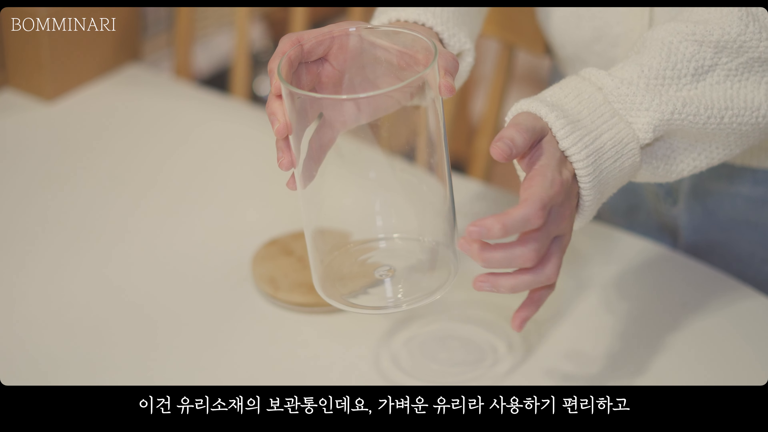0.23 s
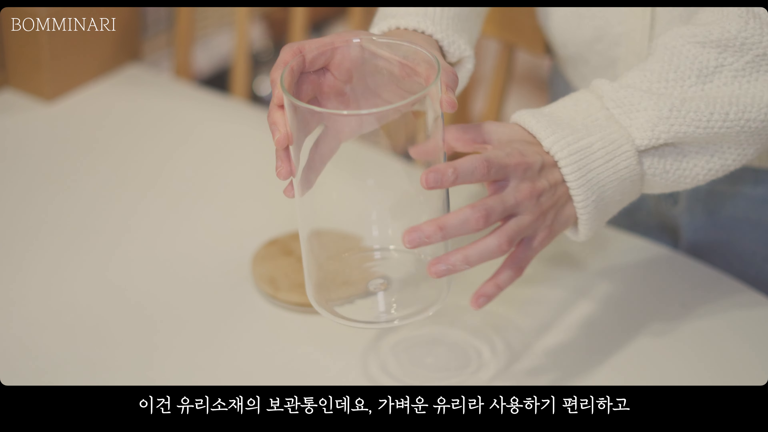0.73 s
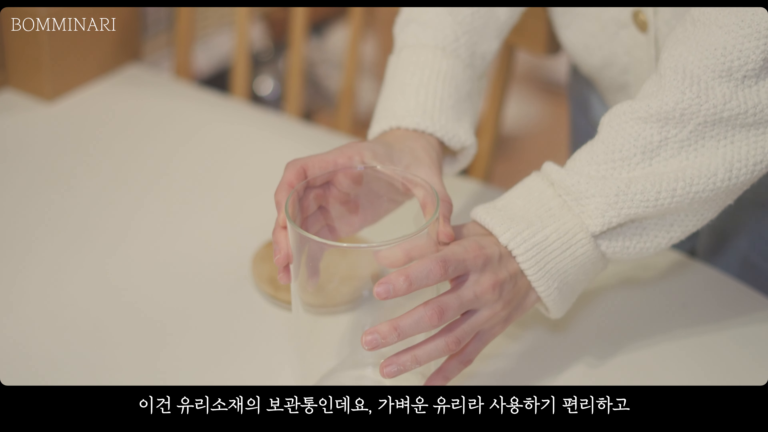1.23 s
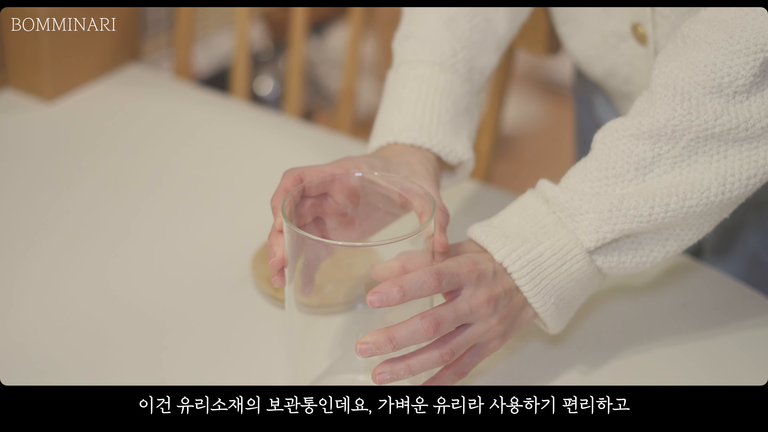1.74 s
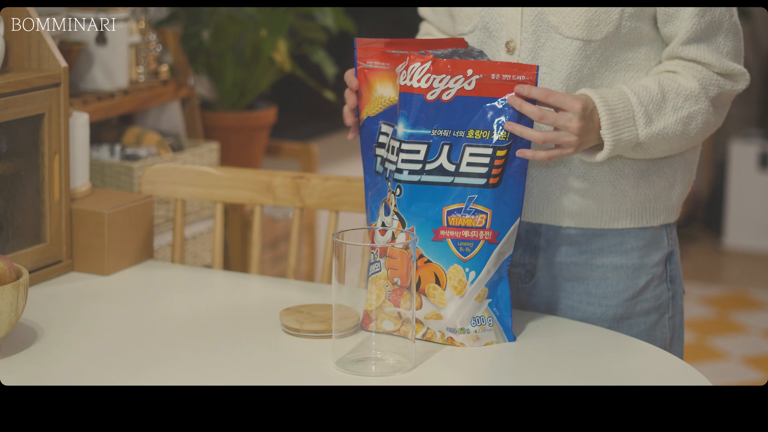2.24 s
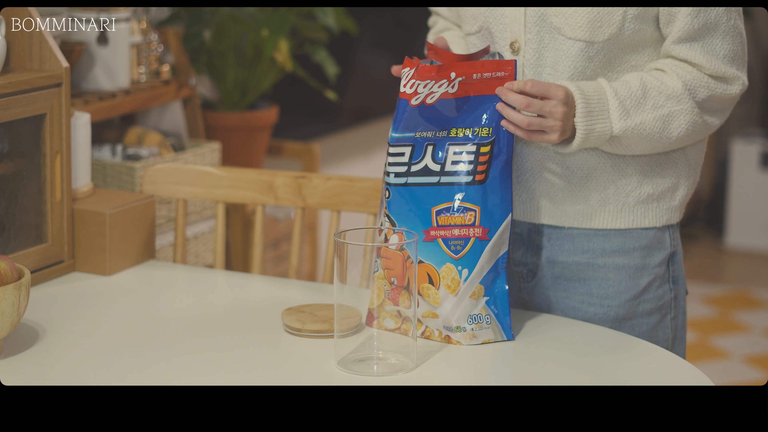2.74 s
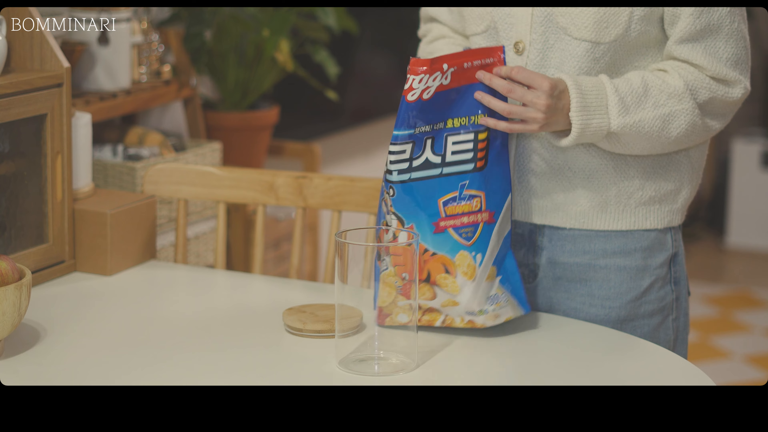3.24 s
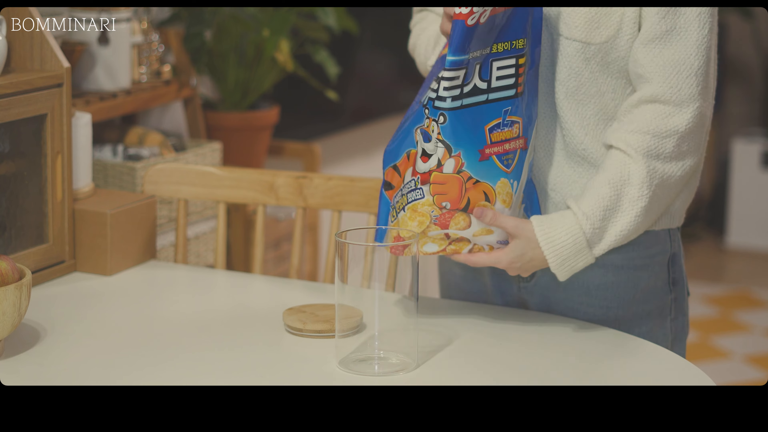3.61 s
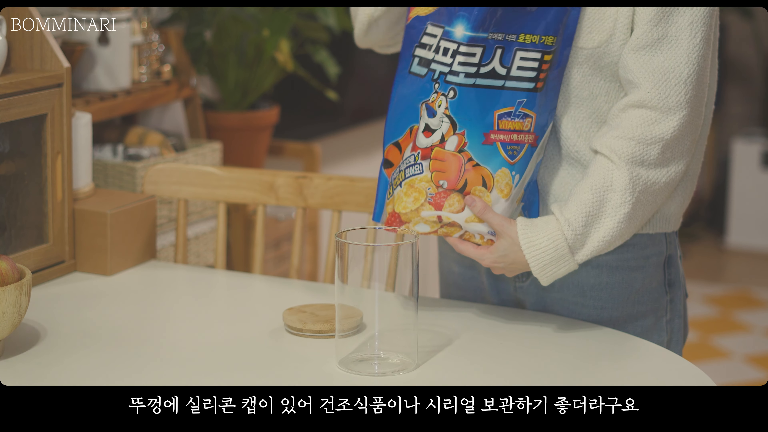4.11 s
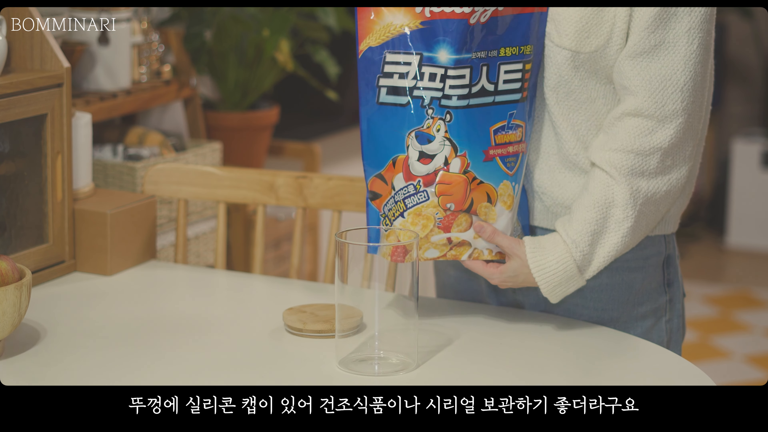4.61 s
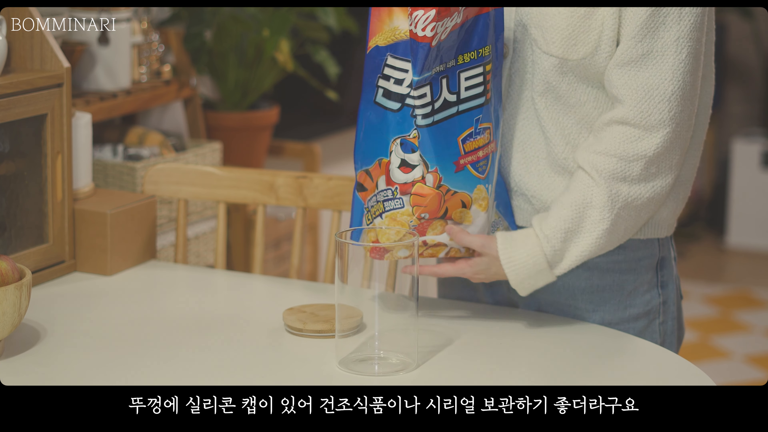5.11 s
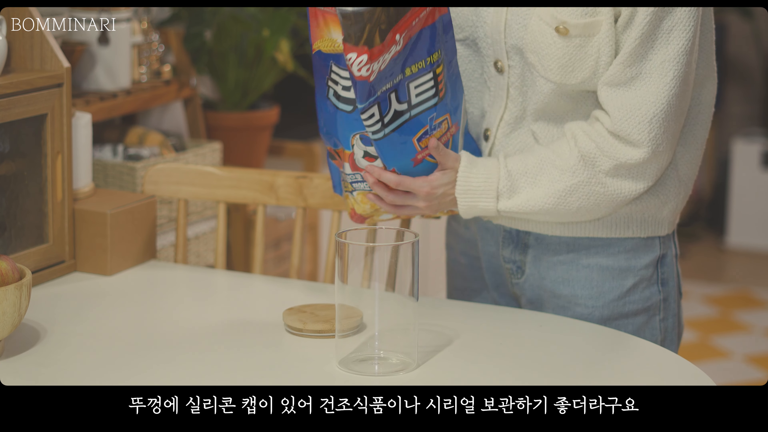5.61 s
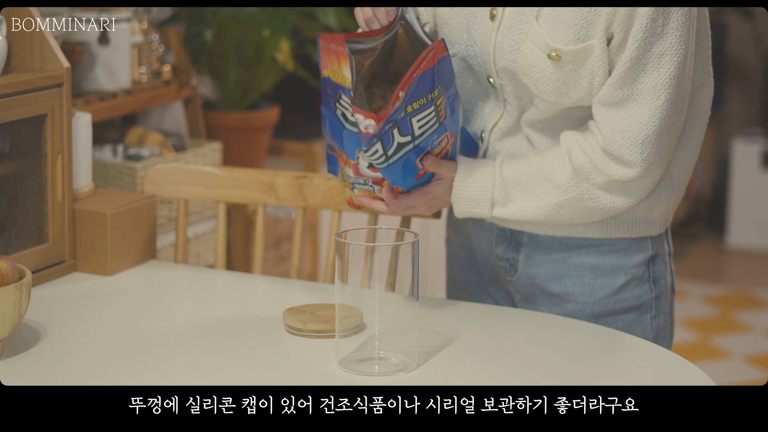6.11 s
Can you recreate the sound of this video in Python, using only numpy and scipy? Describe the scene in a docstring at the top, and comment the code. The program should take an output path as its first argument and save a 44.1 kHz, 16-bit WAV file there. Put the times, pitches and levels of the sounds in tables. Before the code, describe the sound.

Quiet indoor room tone with a barely audible appliance hum. A small piece of metal is tapped lightly four times, then a hollow object knocks twice on a wooden surface. A thick film bag of dry cereal then starts crinkling close by, with loud crisp pops, gritty rustle and brief lulls, getting busier near the end, with short table and wall reflections.

```python
"""In a small hard room, a stiff plastic bag of dry flakes is pulled open and tipped over a table.
Before it come a few light metal clinks and two knocks on wood, made of decaying tones.
The bag is made of short clicks filtered into bands: loud snaps and fine crackle, plus the hiss of sliding film.
The table and walls echo these sounds; a faint appliance hum and microphone hiss lie under them."""
import sys
import numpy as np
from scipy import signal
from scipy.fft import rfft, irfft
from scipy.io import wavfile
from scipy.ndimage import uniform_filter1d

SR = 44100
rng = np.random.default_rng(int(sys.argv[2]) if len(sys.argv) > 2 else 0)


def boost_factor(decibels):
    """Convert a level in decibels to a linear amplitude factor."""
    exponent = np.asarray(decibels, float) / 20
    return 10 ** exponent


def materialize(psi):
    """Save the field psi as 16-bit PCM at rate SR to the path in sys.argv[1].

    A 1-D psi becomes a single channel; in a 2-D psi each row is a channel.
    """
    bounded = np.clip(np.atleast_2d(psi).T, -1, 1)
    quanta = np.round(bounded * 32767).astype(np.int16)
    wavfile.write(sys.argv[1], SR, quanta)


N = 280476
T = np.arange(N) / SR  # seconds
BANDS_HZ = 180 * 2 ** np.arange(0, 6.6, .5)  # half-octave steps
OCTAVES = np.log2(BANDS_HZ / 2000)  # how far each band lies above 2 kHz
PLACES = 8  # places on the bag that make clicks

# Creases that snap. Each row: start in seconds, relative level in dB, favoured frequency in Hz,
# brightness in dB per octave.
SNAP_EVENTS = [(2.2143, -38, 5800, 5.5), (2.3002, -32, 1230, 7.5), (2.3464, -31, 1650, -5.5),
               (2.4214, -29, 1590, -8), (2.4412, -11.5, 1700, 6.5), (2.471, -28.5, 1450, -2),
               (2.539, -22, 1340, -4.5), (2.582, -9.5, 2080, 6), (2.622, -43, 1800, 7),
               (2.7229, -20.5, 1770, -3), (2.7436, -7, 1820, 9), (2.8048, -16, 2200, 1),
               (2.8222, -24, 2900, 1), (2.907, -10.5, 1900, 8.5), (2.927, -20, 1890, -3.5),
               (2.9865, -13.5, 1400, 1.5), (3.04, -20.5, 900, -7.5), (3.179, -26, 1900, 10),
               (3.1907, -13, 1920, 13), (3.2015, -8, 2300, 11), (3.2157, -16, 2600, -3),
               (3.279, -11, 2800, 15), (3.645, -29, 1240, 8), (3.684, -19.5, 1900, 10),
               (3.733, -27, 1320, 3), (3.7955, -21, 1260, 7), (3.8531, -13.5, 2750, 7),
               (3.8802, -20, 1700, 2.5), (4.012, -35, 5500, 14), (4.084, -28.5, 1580, 4.5),
               (4.123, -50, 7100, 21), (4.1794, -25.5, 1370, 10), (4.283, -26.5, 1160, -3),
               (4.299, -22, 1610, -3), (4.3255, -18, 2680, 16.5), (4.343, -10, 2340, 5.5),
               (4.352, -12.5, 2600, -2.5), (4.362, -25, 2900, -4), (4.4027, -15.5, 1890, -2),
               (4.475, -27, 1700, 5), (4.4967, -27.5, 1580, 3), (4.6205, -27, 816, 2),
               (4.907, -31.5, 3060, -3), (4.9403, -25, 1180, -1.5), (4.9701, -23, 1220, 1),
               (4.983, -16, 3420, 5.5), (4.9949, -17.5, 3000, 0), (5.0083, -17, 3640, 3.5),
               (5.086, -21.5, 1970, 4), (5.3014, -25.5, 947, -6), (5.3748, -26, 1280, 7),
               (5.405, -28.5, 1410, 0.2), (5.4899, -10.5, 5860, 10), (5.53, -15, 2200, 1.5),
               (5.6564, -16.5, 2080, -4.5), (5.7813, -19, 1420, 0), (5.8158, -12.5, 1170, 1.5),
               (5.831, -10.5, 2340, 0.5), (5.845, -14.5, 2900, 1), (5.863, -19.5, 2220, 1),
               (5.9995, -19, 2090, 4), (6.024, -16.5, 1300, 2), (6.0455, -15, 1060, -1.5),
               (6.0667, -20.5, 1280, 1), (6.101, -13.5, 5200, 18.5), (6.17, -20, 1690, 9.5),
               (6.2132, -15, 1490, 7.5), (6.275, -19.5, 1320, 8), (6.334, -25, 2200, 25)]


def bag():
    """Every place on the bag sends its own echoes; all have similar room tails, the crackle's slightly weaker."""
    snapping = sum(room(row, -23.0) for row in snaps())
    crackling = sum(room(row, -24.5) for row in crackle())
    rubbing = sum(room(row, -23.5) for row in sliding())
    balance_db = [[.15], [-.15]]  # very slightly to the left
    return (snapping + crackling + rubbing) * boost_factor(balance_db)


def snaps():
    """A big crease gives way in a quick run of cracks: the first is held back, then they fade."""
    cracks, run_ms = 4, 2.2
    first_db, fade_db = -4, -18
    start, level_db, hz, bright = np.transpose(SNAP_EVENTS)
    colour_db = favour(hz, 7.1, 0.32) + bright[:, None] * OCTAVES
    step = np.arange(cracks) / cracks
    chance = rng.random((len(start), 2, cracks))
    times = start[:, None] + run_ms / 1000 * step * (.5 + chance[:, 0])
    crack_db = fade_db * step + first_db * (step == 0)
    sign = np.sign(chance[:, 1] - .5)
    sizes = boost_factor(level_db[:, None] + 3.0 + crack_db) * sign
    # the crease runs along the film, so each crack in a run has its own place
    place = np.arange(times.size) % PLACES
    return clicks(times.ravel(), sizes.ravel(), np.repeat(colour_db, cracks, axis=0), place)


def crackle():
    """Countless small creases and flakes, few large and many small, come in flurries as the hands work."""
    count, first_s = 4000, 2.2
    calm_tilt, shower_tilt = -2.6, 0.11  # brightness in dB per octave
    flurry_samples, flurry_spread_db = 700, 0.5
    steady, shower = working()
    chance = rng.random((count, 4))
    times = first_s + (T[-1] - first_s) * chance[:, 0]
    at = (times * SR).astype(int)
    gain = np.hypot(steady, shower)[at]
    shower_share = (shower[at] / gain) ** 2
    tilt = calm_tilt + (shower_tilt - calm_tilt) * shower_share
    flurry_db = flurry_spread_db * rng.standard_normal(N // flurry_samples + 1)[at // flurry_samples]
    size_db = np.minimum(-5.0 * np.log(1 - chance[:, 1]), 21) + 1.18 + flurry_db
    sizes = gain * boost_factor(size_db) * np.sign(chance[:, 2] - .5)
    own_hz = 650 * 2 ** (4.1 * chance[:, 3])
    colour_db = favour(own_hz, 20, .5) + tilt[:, None] * OCTAVES
    return clicks(times, sizes, colour_db, np.arange(count) % PLACES)


def sliding():
    """Film sliding under the fingers: a fine grainy hiss at the very top, from several places on the bag."""
    # Each row: time in seconds, hiss level in dB relative to the handling strength.
    share = [(2.25, -4), (2.38, -16), (2.55, -22), (3.0, -15), (3.8, -12.5), (4.7, -11), (5.3, -13.5),
             (5.8, -1), (6.1, -6), (6.36, -7)]
    fingers, grain_samples, grain_spread_db = 4, 64, 7.0
    steady, shower = working()
    noise = rng.standard_normal((fingers, N))
    grain_db = grain_spread_db * rng.standard_normal((fingers, N // grain_samples + 1))
    grains = noise * boost_factor(grain_db).repeat(grain_samples, axis=1)[:, :N]
    hiss = band(grains, 14000.)
    hiss = hiss / hiss.sum(axis=0).std()
    strength = np.hypot(steady, boost_factor(-2.5) * shower)
    return hiss * strength * boost_factor(np.interp(T, *np.transpose(share)))


def working():
    """Gain of the steady handling, and of the showers of small creases that each snap shakes loose."""
    # How hard the hands work the bag. Each row: time in seconds, relative crackle level in dB.
    handling = [(2.25, -84), (2.38, -45), (2.7, -51), (3.059, -49.5), (3.16, -57.5), (3.34, -52),
                (3.61, -57.5), (3.73, -44.5), (4.01, -51.5), (4.15, -51), (4.4, -47.5), (4.68, -51),
                (4.746, -50.5), (4.868, -63), (5.0, -49), (5.2, -40.5), (5.33, -52), (5.45, -44),
                (5.62, -46.5), (5.85, -39.5), (5.95, -46.5), (6.1, -44.5), (6.36, -44.5)]
    shower_db, shower_t60 = -23, 0.15  # level against the snap; seconds to fade by 60 dB
    hold = 64  # the shower gain is worked out once in this many samples
    times, effort_db = np.transpose(handling)
    events = np.array(SNAP_EVENTS)
    since = T[::hold] - events[:, :1]
    fading_db = events[:, 1:2] + shower_db - 60 * np.abs(since) / shower_t60
    power = np.sum(boost_factor(2 * fading_db) * (since > 0), axis=0)
    shower = np.sqrt(power).repeat(hold)[:N]
    steady = boost_factor(np.interp(T, times, effort_db, left=-120))
    return steady, shower


def favour(hz, db, octaves):
    """The size of a crease lifts the bands around one frequency."""
    return db * np.exp(-(np.log2(BANDS_HZ / hz[:, None]) / octaves) ** 2)


def clicks(times, sizes, colour_db, place):
    """Each click kicks the film's bands with its own colour; one row of sound for each place on the bag."""
    # How strongly the film sounds. Each row: frequency in Hz, relative level in dB per band.
    film = [(180, -46), (350, -7), (700, 0.5), (1500, 5.5), (3000, 3.5), (6000, -7.5), (10000, -22.5),
            (16000, -34)]
    weight = boost_factor(colour_db + on_log(film, BANDS_HZ)) / np.sqrt(BANDS_HZ)
    # colour must not change the click's overall strength
    strength = np.sqrt(weight ** 2 @ BANDS_HZ / SR)
    weight = weight * (sizes / strength)[:, None]
    at = np.clip((times * SR).astype(int), 0, N - 1) + N * place
    out = 0
    for w, hz in zip(weight.T, BANDS_HZ):
        kicks = np.bincount(at, w, N * PLACES).reshape(PLACES, N)
        out = out + band(kicks, hz)
    return out


def clinks():
    """A small metal piece tapped lightly on one spot: its modes, a short scratchy tick and a fading rattle."""
    # Each row: start in seconds, relative level in dB.
    taps = [(0.012, -22), (0.2123, -23.5), (0.3979, -23.5), (0.535, -19)]
    # Ringing tones of the metal. Each row: frequency in Hz, relative level in dB, time to fade by 60 dB in seconds.
    metal = [(625, -12, 0.04), (672, -16, 0.2), (1230, -15, 0.036), (1730, -17, 0.05), (2308, -20, 0.13),
             (3294, -5, 0.085), (4085, -11, 0.07), (4121, -5, 0.06), (4333, -9, 0.09), (4490, -16, 0.07),
             (6040, -16, 0.14), (6235, 0, 0.055), (6384, -18, 0.05), (6798, -4, 0.07), (6855, -14, 0.08),
             (7340, -8, 0.09), (8450, -16, 0.1), (9270, -16, 0.12), (9540, -14, 0.11), (11640, -21, 0.12),
             (12175, -15.5, 0.1), (13700, -17, 0.1), (15080, -15, 0.05)]
    t = T[:SR // 2]
    out = np.zeros(N)
    for start, db in taps:
        scratch = boost_factor(-9) * np.exp(-t / 0.001)
        rattle = boost_factor(-30) * np.exp(-t / 0.04)
        tick = (scratch + rattle) * rng.standard_normal(len(t))
        out[int(start * SR):][:len(t)] += boost_factor(db - 6.5) * (ring(metal, 0, 0.21) + tick)
    return room(out, -31)


def knocks():
    """Something hollow set down on wood: each blow sets off short decaying tones."""
    # Each row: start in seconds, relative level in dB, brightness in dB per octave,
    # contact time in ms, room tail in dB.
    blows = [(1.3659, -17.5, 3, 0.039, -21), (1.6016, -19.5, 2, 0.21, -28)]
    # Tones of the wood. Each row: frequency in Hz, relative level in dB,
    # time to fade by 60 dB in seconds (ring() uses at least 0.0015).
    wood = [(205, -1, 0.019), (389, -2.5, 0.027), (500.2, -5.5, 0.16), (573, -6, 0.066), (650, -5, 0.1),
            (700, -2, 0.074), (804, 7.5, 0.013), (887, -14.5, 0.24), (940, -7, 0.099), (1043, 0, 0.031),
            (1240, 3.5, 0.017), (2080, 5, 0.0035), (3100, -9, 0.0057), (3830, -2, 0.0013),
            (6740, -42, 0.035), (9900, -30.5, 0.0064)]
    return sum(blow(start, boost_factor(db) * ring(wood, bright_db, contact_ms), wet_db)
               for start, db, bright_db, contact_ms, wet_db in blows)


def blow(start, sound, wet_db):
    """A sound starting at a given second, heard in the room with slightly weaker first echoes."""
    out = np.zeros(N)
    i = int(start * SR)
    out[i:i + len(sound)] = sound
    return room(out, wet_db, -2.0)


def ring(modes, bright_db, contact_ms):
    """One blow: decaying modes, tilted around 1 kHz and eased in by the contact; peak 1."""
    t = T[:SR // 2]
    y = 0
    for k, (hz, db, t60) in enumerate(modes):
        level_db = db + bright_db * np.log2(hz / 1000) - 60 * t / max(t60, .0015)
        y = y + (-1) ** k * boost_factor(level_db) * np.sin(2 * np.pi * hz * t)
    y = y * (1 - np.exp(-1000 * t / max(contact_ms, .02)))
    return y / np.abs(y).max()


def room(x, wet_db, echo_db=0):
    """Direct sound, first echoes, then a diffuse tail that dies band by band."""
    # Echoes off the table and near walls. Each row: delay in ms, relative level in dB.
    echoes = [(3.0, 1), (4.2, -4), (7.5, -19)]
    # Each row: frequency in Hz, time for the tail to fade by 60 dB in seconds (at least 0.05 is used).
    fading = [(150, 0.37), (500, 0.37), (2000, 0.33), (7000, 0.2), (15000, 0.024)]
    tilt_db = -1.5  # the tail is duller: dB per octave above 2 kHz
    smear_ms = 0.07  # an uneven surface smears each echo
    t = T[:SR // 2]
    noise = pair(len(t), 2000, -2.4)
    tail = 0
    for hz, up in zip(BANDS_HZ, OCTAVES):
        level_db = tilt_db * max(up, 0) - 60 * t / max(on_log(fading, hz), .05)
        tail = tail + band(noise, hz) * boost_factor(level_db)
    response = boost_factor(wet_db) * tail * (1 - np.exp(-(t / 0.0014) ** 2))  # the tail swells in
    response[:, 0] += 1
    for ms, db in echoes:
        late_ms = ms * rng.uniform(.9, 1.1)  # each place has slightly different paths
        smear = pair(64, 5100, -4.5) * np.exp(-1000 * t[:64] / smear_ms)
        smear = smear / np.sqrt(np.mean(np.sum(smear ** 2, axis=1)))
        response[:, int(late_ms * SR / 1000):][:, :64] += boost_factor(db + echo_db) * smear
    return signal.fftconvolve(np.atleast_2d(x), response, axes=1)[:, :N]


def pair(n, apart_hz, apart_db):
    """Diffuse noise at two close microphones: alike in the bass, more apart in the treble."""
    mid, side = rng.standard_normal((2, n))
    side = boost_factor(apart_db) * signal.lfilter(*signal.butter(1, apart_hz, "high", fs=SR), side)
    return np.array([mid + side, mid - side])


def band(x, hz):
    """Broad resonance with steep skirts: the same filter twice."""
    b, a = signal.iirpeak(hz, 1.0, SR)
    return signal.lfilter(b, a, signal.lfilter(b, a, x))


def on_log(table, hz):
    """Read a table of frequencies and values on a log-frequency axis."""
    f, v = np.transpose(table)
    return np.interp(np.log(hz), np.log(f), v)


def air():
    """Room tone and microphone hiss as shaped noise, with appliance hum as two slightly wavering tones."""
    # Colour of the noise. Each row: frequency in Hz, relative level in dB per Hz.
    colour = [(18, -57), (30, -23), (81, -19), (140, -13), (215, -6.5), (569, -2), (632, -6), (721, -0.5),
              (1350, -9.5), (1540, -9.5), (3770, -17), (10200, -19), (16000, -19.5)]
    # Each row: frequency in Hz, middle level in dB.
    hum = [(242.2, -81), (624.5, -89)]
    noise_db, waver_db = -64.5, 4.5
    noise = pair(N, 590, -0.67)
    hz = np.maximum(np.fft.rfftfreq(N, 1 / SR), 1)
    out = irfft(rfft(noise) * boost_factor(on_log(colour, hz)), N)
    out = out * boost_factor(noise_db) / out.std()
    for f, db in hum:
        # noise averaged twice drifts slowly
        waver = uniform_filter1d(uniform_filter1d(rng.standard_normal(N), SR // 16), SR // 16)
        level_db = db + waver_db * waver / waver.std()
        out = out + np.sqrt(2) * boost_factor(level_db) * np.sin(2 * np.pi * f * T)
    return out


def scene():
    """Small things radiate little bass; the room tone lies under them."""
    near = bag() + clinks() + knocks()
    bass_cut = signal.butter(3, 250, "high", fs=SR, output="sos")
    return signal.sosfilt(bass_cut, near) + air()


def low_pass(x):
    """Removes everything above the highest recorded frequency."""
    return signal.sosfilt(signal.butter(12, 16820, fs=SR, output="sos"), x)


def record(dry):
    """A steep filter cuts the top above 15.9 kHz."""
    top_cut = signal.ellip(10, .2, 35, 15900, fs=SR, output="sos")
    mix = signal.sosfilt(top_cut, dry)
    return low_pass(mix)


dry = scene()
out = record(dry)
materialize(out)
```